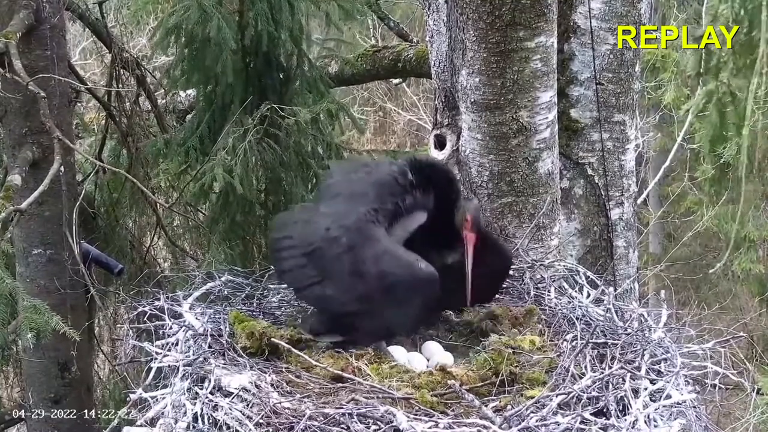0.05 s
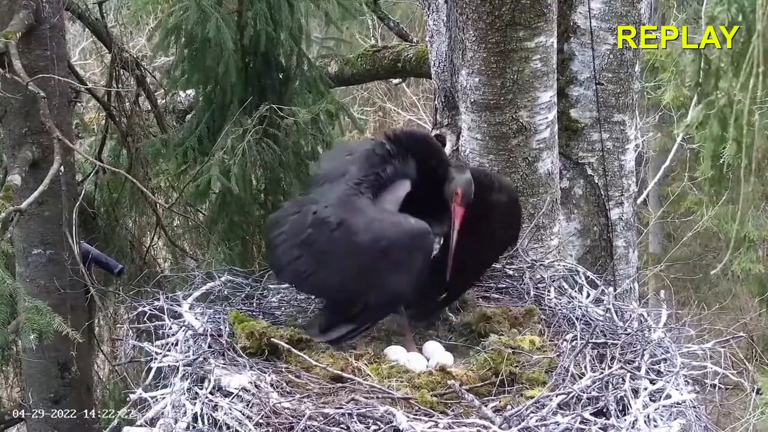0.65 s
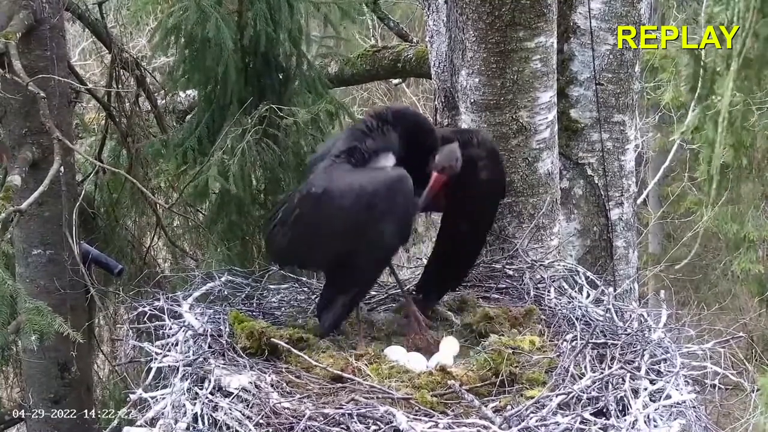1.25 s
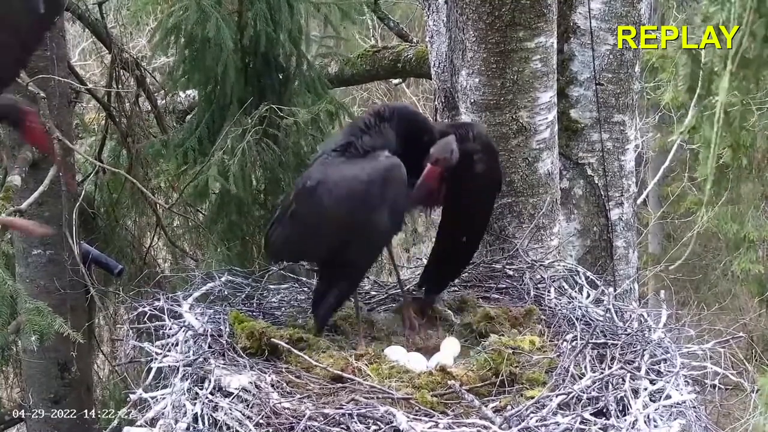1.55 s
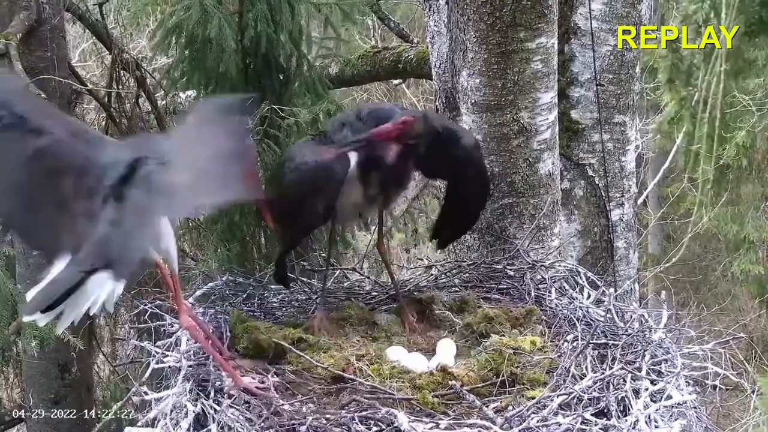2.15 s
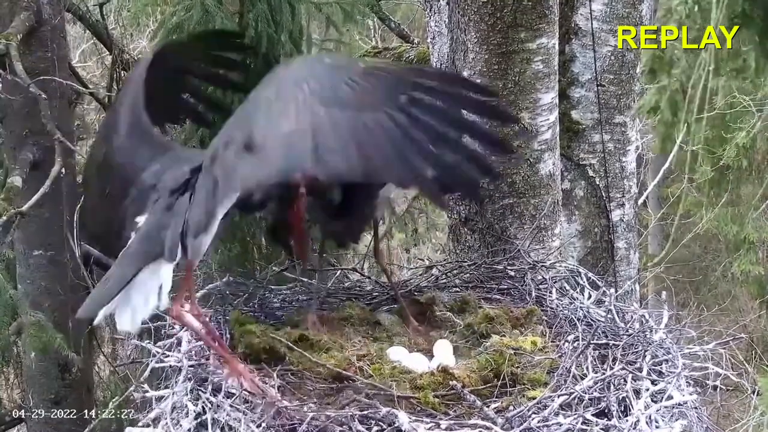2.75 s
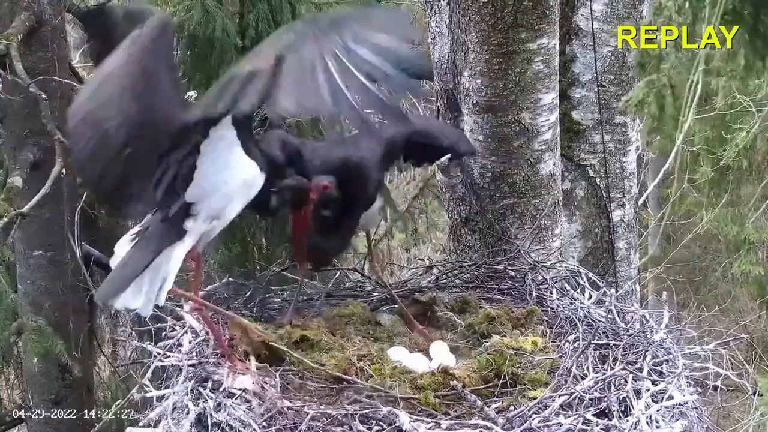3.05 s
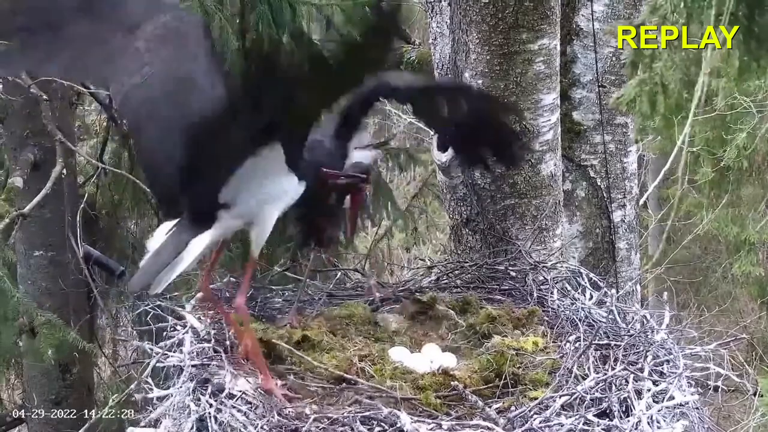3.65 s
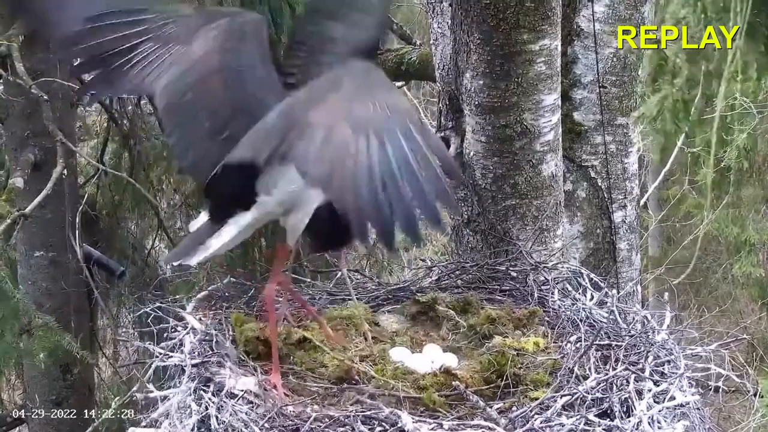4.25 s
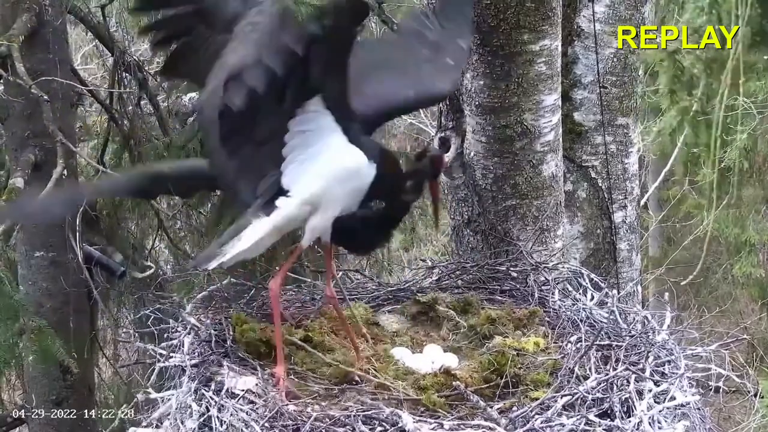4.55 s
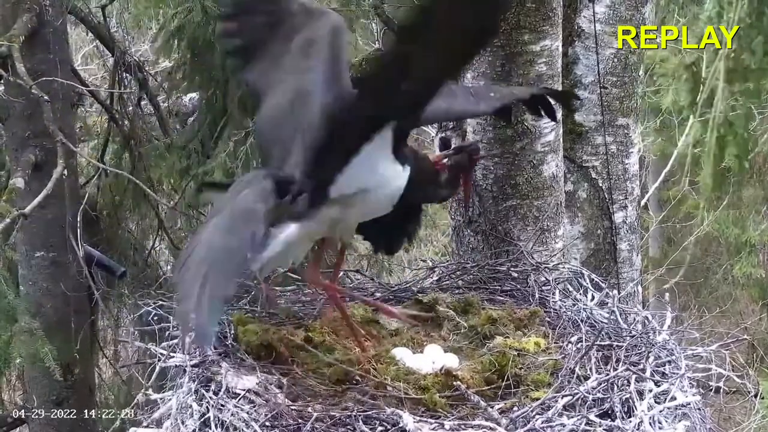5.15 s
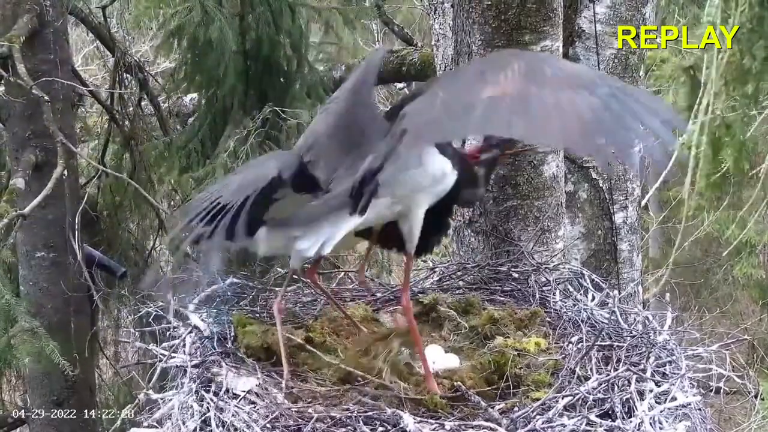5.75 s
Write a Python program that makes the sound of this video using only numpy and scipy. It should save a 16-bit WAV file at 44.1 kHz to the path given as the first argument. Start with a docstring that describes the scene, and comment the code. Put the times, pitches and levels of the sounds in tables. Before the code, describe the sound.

A large bird lands on a stick nest with sweeping wings and snapping twigs, amid hoarse hisses and three thin whistles.

```python
"""A black stork lands beside its mate on a stick nest high in a forest tree, over a low outdoor rumble.
First, feathers rustle on the sticks, twigs snap and a foot knocks the nest.
From 1.6 to 3.6 s, hoarse hisses of breath alternate with three thin, arched whistles.
Wings sweep the sticks during the calls and hardest near 4.2 s.
From 5.4 s, sweeps and snaps crowd together; heavy blows thud on the nest and ring the bough."""
import sys
import numpy as np
from scipy import signal
from scipy.fft import rfft, irfft, next_fast_len
from scipy.io import wavfile
from scipy.ndimage import uniform_filter1d, map_coordinates

SR = 44100
rng = np.random.default_rng(int(sys.argv[2]) if len(sys.argv) > 2 else 0)


def to_wav(sig):
    """Store sig (one row per channel, or 1-D mono) as 16-bit WAV at the path in sys.argv[1].

    Samples outside -1..1 are clipped; the rate is SR.
    """
    pcm = np.clip(np.atleast_2d(sig), -1, 1) * 32767
    pcm = np.round(pcm).astype(np.int16)
    wavfile.write(sys.argv[1], SR, pcm.T)  # frames by channels


N = 264147
TIME = np.arange(N) / SR

# Background. Each row: time in seconds, relative gust and rumble levels in dB.
WIND_LEVELS = [(0.0, -48.5, -41), (1.5, -42.5, -39.5), (2.7, -55, -43), (3.8, -49.5, -43),
               (5.1, -64, -42.5), (5.99, -54, -41.5)]
# Swells of deep air. Each row: centre in seconds, half length in seconds, level in dB.
GUST_SWELLS = [(0.98, 0.05, -31), (1.986, 0.057, -37.5), (5.697, 0.029, -45)]
# Gust and rumble spectra. Each row: frequency in Hz, gain in dB.
GUST_SPECTRUM = [(12, 2.5), (25, 10.5), (45, 28.5), (65, 10), (110, -24), (400, -53.5), (2000, -83.5)]
RUMBLE_SPECTRUM = [(40, -17), (70, -2), (110, 1), (160, -2.5), (250, -10), (400, -20.5), (700, -29),
                   (1200, -40.5), (2400, -45.5), (3300, -53), (4200, -59.5), (13000, -61)]
# Trunk, boughs and nearby trees. Each row: delay in seconds, gain in dB.
TREE_ECHOES = [(.0043, -34), (0.009, -21), (0.022, -26.5), (0.087, -30.5), (0.121, -42)]
# Feathers and feet stirring. Each row: time in seconds, relative level in dB.
RUSTLE_LEVELS = [(0.0, -85), (0.58, -71), (0.82, -64), (1.42, -61.5), (2.03, -51.5), (2.25, -55.5),
                 (2.47, -59), (2.62, -60.5), (3.1, -68.5), (3.49, -59), (3.7, -73.5), (4.1, -60),
                 (4.59, -60.5), (4.9, -59.5), (5.75, -52.5), (5.99, -49)]
# Feathers and quills on sticks. Each row: frequency in Hz, gain in dB.
FEATHER_SPECTRUM = [(500, -26), (900, -2.5), (1200, -0.5), (1800, 6), (2400, 6), (2900, -2), (3800, 1),
                    (5000, -7), (6600, -9), (9000, -8.5), (12000, -14.5), (13500, -18)]
QUILL_SPECTRUM = [(120, -40), (200, -42), (284, 10.5), (328, -37), (442, -2), (483, -8.5), (763, -3),
                  (1230, -9), (1460, 0), (2400, 6), (2860, -8.5), (3720, -5), (5200, -19), (9140, -23),
                  (13500, -33)]
# Feet on the moss lining. Each row: centre in seconds, half length in seconds, level in dB.
FOOT_SCUFFS = [(0.78, 0.024, -53.5), (2.027, 0.16, -54), (2.457, 0.08, -58), (4.4, 0.023, -55),
               (4.484, 0.03, -56)]
# Blows of feet and wings. Each row: start in seconds, relative level in dB, thud gain in dB,
# seconds for the rattle to fall 30 dB, relative bough ring in dB.
NEST_BLOWS = [(0.694, -45.5, 1.5, 0.19, -14), (1.966, -42.5, 13, 0.038, -26), (5.698, -29, -3, 0.032, -3),
              (5.9593, -29.5, 9.5, 0.058, -32), (5.9651, -23.5, -5, 0.037, -25)]
# Stick heap. Each row: frequency in Hz, width in Hz, gain in dB.
HEAP_MODES = [(132, 91, 7), (226, 36, -1), (420, 42, -21.5), (795, 23, -15), (1000, 430, -2),
              (1570, 180, 0), (2210, 290, -19), (3020, 300, -61.5)]
# Bough. Each row: frequency in Hz, T60 in seconds, gain in dB.
BOUGH_RING = [(413, 0.13, -3.5), (493, 0.067, 0), (618, 0.2, -1.5), (744, 0.12, -11), (1410, 0.026, 10.5),
              (2400, 0.035, 3)]
# Loud snaps. Each row: start in seconds, peak in dB, ring in Hz, wood and splinter in dB re the crack.
TWIG_SNAPS = [(0.071, -43.5, 3500, -10, 13), (0.329, -43, 2220, -17, -17), (0.489, -49, 2280, -8, -20),
              (0.632, -40, 2000, 3, -16), (0.6865, -37, 1990, -15, -14), (0.6934, -30.5, 2360, 8, -7),
              (0.916, -31.5, 2130, 4.5, -15), (1.534, -42.5, 3000, 7, 6), (2.128, -15.5, 2260, -10, -20.5),
              (2.1887, -34, 3120, -15, -18), (3.319, -31.5, 3260, -14, -13), (3.6624, -41.5, 2290, -7, -18),
              (3.972, -37, 2260, -20, -23), (4.021, -34.5, 1990, 9, -20), (4.3234, -26, 2440, -10, -6),
              (4.8962, -32.5, 2560, -5, -3.5), (5.254, -36, 2320, -18, 5), (5.371, -38, 2300, -4, 1),
              (5.4205, -35.5, 3800, -20, 6), (5.4698, -31, 2300, 0, -3), (5.4955, -23, 2300, -5, -7),
              (5.668, -15.5, 3360, -5.5, -20), (5.83, -33, 2500, -4, -10)]
# Twig resonances. Each row: multiple of the ring pitch, width in Hz, gain in dB.
CRACK_MODES = [(.68, 400, -3.5), (1, 331, 6.5), (1.55, 450, -15)]
# Wing strokes. Each row: peak time, rise and fall in seconds, level in dB, treble gain in dB.
WING_STROKES = [(1.772, 0.019, 0.023, -45.5, 14.5), (1.975, 0.057, 0.018, -46, -11),
                (2.04, 0.081, 0.028, -52.5, 26), (2.48, 0.21, 0.086, -48, 15.5),
                (3.766, .13, 0.081, -49.5, 13), (4.122, 0.017, 0.09, -32, 3.5),
                (4.174, 0.037, 0.041, -25.5, 2.5), (4.411, 0.087, 0.092, -50, 16),
                (4.55, 0.11, 0.14, -57.5, 18), (5.499, 0.029, 0.058, -39, 15),
                (5.509, 0.0064, 0.0055, -28, 5), (5.582, 0.022, .025, -43, 14.5),
                (5.686, 0.045, 0.057, -40, 10), (5.902, 0.015, 0.03, -34.5, 5.5),
                (5.927, 0.016, 0.024, -32, 7.5), (5.98, 0.01, .05, -34.5, 21.5)]
# Hisses. Each row: start, crest and end in seconds, relative level in dB, wheeze at the crest in Hz.
HISS_CALLS = [(1.582, 1.739, 1.796, -45.5, 3700), (2.136, 2.314, 2.395, -44.5, 3430),
              (2.705, 2.875, 2.96, -37, 3667), (3.29, 3.328, 3.43, -40.5, 3065),
              (3.349, 3.473, 3.535, -47, 3560), (3.543, 3.564, 3.62, -56.5, 3100)]
# Breath of a hiss; air beside a whistle; bill filter on overtones. Each row: frequency in Hz, gain in dB.
THROAT_SPECTRUM = [(900, -53.5), (1500, -30.5), (2050, -12.5), (2500, -3), (2900, -1.5), (3450, 0),
                   (3900, -2), (4400, -9.5), (5400, -20.5), (6500, -46), (8200, -29), (10500, -37),
                   (14000, -64)]
AIR_SPECTRUM = [(900, -41.5), (1500, -33), (2100, -5), (2650, 1), (3600, 1.5), (4300, -6.5), (5200, -18),
                (6700, -28.5), (8800, -24.5), (11000, -34), (14000, -43)]
BILL_RESPONSE = [(2600, -8), (4200, 2.5), (5000, 6.5), (5650, -1.5), (6200, -12), (7200, -16), (8400, -8),
                 (9400, -14), (11500, -18)]
# Whistles. Each row: start, crest and end in seconds, lower-register crest pitch and sag in Hz,
# level in dB, attack and release in seconds, relative overtone and rasp levels in dB, flutter in dB.
WHISTLE_CALLS = [(1.839, 2.001, 2.133, 2923, 544, -30.5, 0.03, 0.039, -23.5, -20.5, 2.5),
                 (2.393, 2.546, 2.7, 2877, 443, -34.5, 0.13, 0.055, -13.5, -24, 1.6),
                 (2.966, 3.109, 3.275, 3025, 1333, -20.5, 0.032, .14, -22.5, -27, 0.3)]
# Upper register of a forced whistle. Each row: start and end in seconds, pitch in Hz, glide in Hz/s.
REGISTER_LEAPS = [(1.991, 2.053, 3305, -1200), (3.033, 3.153, 3078, 654.5)]


def from_db(db):
    """Decibels to gain."""
    return 10 ** (np.asarray(db) / 20)


def rms_one(x):
    """Scales to unit power."""
    return x / np.sqrt(np.mean(x ** 2) + 1e-20)


def in_time(rows):
    """Each column of a curve, per sample."""
    s, *columns = np.transpose(rows)
    return [np.interp(TIME, np.sort(s), c) for c in columns]


def swells(rows):
    """Sum of bell-shaped envelopes."""
    return sum(from_db(db) * np.exp(-((TIME - s) / half_s) ** 2) for s, half_s, db in rows)


def drift(rate_hz):
    """Smooth random wander; rms one."""
    coarse = TIME[::16]
    wander = map_coordinates(rng.standard_normal(N // 32), [coarse * rate_hz * 2], order=2, mode="wrap")
    return np.interp(TIME, coarse, rms_one(wander))


def band(x, low_hz, high_hz):
    """Causal band-pass."""
    return signal.sosfilt(signal.butter(2, [low_hz, high_hz], "band", fs=SR, output="sos"), x)


def colour(x, spectrum):
    """Gives a steady noise a spectrum; rms one."""
    hz, db = np.transpose(spectrum)
    size = next_fast_len(N)
    bins_hz = np.maximum(np.arange(size // 2 + 1) * SR / size, 1)
    gain = from_db(np.interp(np.log(bins_hz), np.log(hz), db))
    return rms_one(irfft(rfft(x, size) * gain, size)[:N])


def noise(spectrum):
    """Coloured Gaussian noise; rms one."""
    return colour(rng.standard_normal(N), spectrum)


def narrow_noise(phase, rate_hz, on):
    """Noise band around a carrier phase."""
    return drift(rate_hz)[on] * np.sin(phase) + drift(rate_hz)[on] * np.cos(phase)


def resonance(x, hz, width_hz):
    """One damped mode; peak gain one."""
    r = np.exp(-np.pi * width_hz / SR)
    gain = (1 - r * r) / 2
    return signal.lfilter([gain, 0, -gain], [1, -2 * r * np.cos(2 * np.pi * hz / SR), r * r], x)


def grains(per_s, spread_db):
    """Random tiny contacts of uneven size."""
    sizes = from_db(spread_db * np.minimum(rng.exponential(1, N), 4))
    return rms_one(sizes * rng.choice([-1, 1], N) * (rng.random(N) < per_s / SR))


def add(out, start_s, sound):
    """Mixes a sound in."""
    start = int(start_s * SR)
    out[start:start + len(sound)] += sound[:max(N - start, 0)]


def wind(gustiness_db=0.5, rumble_gain_db=0.5):
    """Steady outdoor rumble with slow gusts beneath it."""
    gust_db, rumble_db = in_time(WIND_LEVELS)
    gusts = (from_db(gust_db + gustiness_db * drift(4)) + swells(GUST_SWELLS)) * noise(GUST_SPECTRUM)
    return gusts + from_db(rumble_db + rumble_gain_db) * noise(RUMBLE_SPECTRUM)


def forest(x, tail_db=-25, t60_s=0.22):
    """Adds echoes from the nearest wood and faint scatter from the trees around."""
    response = band(rng.standard_normal(SR), 270, 5000) * from_db(-60 * TIME[:SR] / t60_s)
    response = from_db(tail_db) * response / np.linalg.norm(response)
    for delay_s, db in TREE_ECHOES:
        response[int(delay_s * SR)] += from_db(db)
    return x + signal.fftconvolve(x, response)[:N]


def rustle(feather_db=1.5, moss_db=-5.5, waver_db=2.5):
    """Feathers slide over sticks in fine grains; the moss lining crunches dully."""
    db, = in_time(RUSTLE_LEVELS)
    feathers = from_db(feather_db) * colour(grains(per_s=9000, spread_db=2.9), FEATHER_SPECTRUM)
    moss = from_db(moss_db) * rms_one(band(grains(per_s=2500, spread_db=4.0), 320, 700))
    return from_db(db + waver_db * drift(25)) * (feathers + moss)


def scuffs(grit_db=6.5):
    """A foot drags through the lining with a short, hollow crunch."""
    crunch = grains(per_s=3000, spread_db=5.6)
    hollow = rms_one(resonance(crunch, 500, 270) - resonance(crunch, 793, 113))
    return swells(FOOT_SCUFFS) * hollow * from_db(grit_db * drift(80))


def knocks(heap_db=-20.0, bough_db=7.0, rattle_gain=0.18, thud_below_hz=500):
    """A blow rattles the springy stick heap; the bough rings on."""
    out, age = np.zeros(N), TIME[:SR // 5]
    bough = sum(from_db(db - 60 * age / t60_s) * np.sin(2 * np.pi * hz * age)
                for hz, t60_s, db in BOUGH_RING) / 2
    for start_s, db, thud_db, rattle_s, ring_db in NEST_BLOWS:
        blow = rattle_gain * rng.standard_normal(len(age)) * from_db(-30 * age / rattle_s)
        blow[0] = 2  # impact
        heap = sum(from_db(mode_db + thud_db * (hz < thud_below_hz)) * rms_one(resonance(blow, hz, width))
                   for hz, width, mode_db in HEAP_MODES)
        add(out, start_s, from_db(db) * (from_db(heap_db) * heap + from_db(bough_db + ring_db) * bough))
    return out


def small_twigs(per_s=4.5, gain_db=14, spread_db=3, ring_hz=2310, wood_db=-11, splinter_db=-9.5):
    """Snap rows for small twigs giving way at random, as strongly as the birds stir."""
    wait, strength = rng.random((64, 2)).T
    starts_s = np.cumsum(-np.log(1 - wait)) / per_s
    peaks_db = np.interp(starts_s, *np.transpose(RUSTLE_LEVELS)) + gain_db + spread_db * (2 * strength - 1)
    return [(s, db, ring_hz, wood_db, splinter_db) for s, db in zip(starts_s, peaks_db)]


def twigs(tear_t60_s=0.022, tear_gain=0.25, spray_decay_s=0.0026):
    """One sharp crack through the wood, then a short spray of tearing fibres."""
    out, age = np.zeros(N), TIME[:SR // 10]
    for start_s, peak_db, ring_hz, wood_db, splinter_db in TWIG_SNAPS + small_twigs():
        snap = tear_gain * rng.standard_normal(len(age)) * from_db(-60 * age / tear_t60_s)
        snap[0] = 2  # fracture
        spray = rng.standard_normal(len(age)) * np.exp(-age / spray_decay_s)
        ring = sum(from_db(db) * resonance(snap, ratio * ring_hz, width)
                   for ratio, width, db in CRACK_MODES)
        wood = from_db(wood_db) * rms_one(band(snap, 320, 730))
        crack = rms_one(band(ring, ring_hz / 2, ring_hz * 2))
        splinters = from_db(splinter_db) * rms_one(band(spray, 5700, 11100))
        sound = wood + crack + splinters
        add(out, start_s, from_db(peak_db) * sound / np.abs(sound).max())
    return out


def wing_sweeps(flutter_db=3.0, treble_hz=4800, air_db=-15.5, air_follow=0.7):
    """Stiff quills rake the sticks in a burst of contacts; the wing pushes a puff of air."""
    rake = colour(grains(per_s=11000, spread_db=2.8), QUILL_SPECTRUM) * from_db(flutter_db * drift(170))
    treble = signal.sosfiltfilt(signal.butter(2, treble_hz, "high", fs=SR, output="sos"), rake)
    air = rms_one(band(rng.standard_normal(N), 120, 520))
    out = np.zeros(N)
    for peak_s, rise_s, fall_s, db, treble_db in WING_STROKES:
        away = np.maximum((peak_s - TIME) / rise_s, (TIME - peak_s) / fall_s)
        near = away < 4
        stroke = from_db(-18.7 * away[near] ** 1.44)
        quills = from_db(db) * (rake[near] + (from_db(treble_db) - 1) * treble[near])
        out[near] += stroke * (quills + from_db(air_db + air_follow * db) * air[near])
    return out


def hiss(row, gain_db=-1.5, swell_db=10.5, rough_db=0.5, wheeze_db=-4.5, edge_s=0.012, throat_hz=3480):
    """Unvoiced rush with a narrow wheeze; both swell and slide up as the throat opens."""
    start_s, crest_s, end_s, crest_db, crest_hz = row
    away = np.maximum((crest_s - TIME) / (crest_s - start_s), (TIME - crest_s) / (end_s - crest_s))
    closing = np.clip(away, 0, 1) ** 1.5
    db = crest_db + gain_db - swell_db * closing
    hz = crest_hz * (1 - 0.16 * closing)
    gate = np.clip(np.minimum(TIME - start_s, end_s - TIME) / edge_s, 0, 1)
    on = gate > 0
    read_at = np.cumsum((hz[on] / throat_hz) ** 0.9)  # the spectrum slides with the wheeze
    rush = np.zeros(N)
    rush[on] = map_coordinates(noise(THROAT_SPECTRUM)[:SR], [read_at], order=3, mode="wrap")
    phase = 2 * np.pi * np.cumsum(hz[on]) / SR
    rush[on] += from_db(wheeze_db) * narrow_noise(phase, 200, on)
    return from_db(db + rough_db * drift(100)) * rush * gate


def whistle_arch(t, start_s, crest_s, end_s, crest_hz, sag_hz, db, attack_s, release_s):
    """Pitch and level: scoops up from slack, climbs, may leap, sags, drops as the air runs out."""
    slack_hz, scoop_s, climb_hz_per_s, spent_hz, drop_s = 1789, 0.01, 3300, 1400, 0.013
    attack_db, release_db = 19.5, 34
    leap_db, leap_sag_db_per_s, leap_s = 3, 35, 0.0029
    age, left = np.maximum(t - start_s, 0), np.maximum(end_s - t, 0)
    hz = crest_hz - climb_hz_per_s * np.maximum(crest_s - t, 0)
    hz -= sag_hz * (np.maximum(t - crest_s, 0) / (end_s - crest_s)) ** 2
    hz += (slack_hz - hz) * np.exp(-age / scoop_s) + (spent_hz - hz) * np.exp(-left / drop_s)
    level_db = db - attack_db * np.maximum(1 - age / attack_s, 0) ** 2
    level_db -= release_db * np.maximum(1 - left / release_s, 0) ** 1.6
    for up_s, down_s, upper_hz, glide_hz_per_s in REGISTER_LEAPS:
        upper = np.clip(np.minimum(t - up_s, down_s - t) / leap_s + 0.5, 0, 1)
        hz += upper * (upper_hz + glide_hz_per_s * (t - up_s) - hz)
        level_db += upper * (leap_db - leap_sag_db_per_s * (t - up_s))
    return hz, level_db


def whistle(row, jitter=0.0098, waver=0.0062, fray=0.29, rasp_blur=1.7, overtone_growth=0.32, air_db=-48):
    """A nearly pure, trembling tone; breaks up where weak, frays where forced."""
    start_s, crest_s, end_s, *shape, overtone_db, rasp_db, flutter_db = row
    gate = uniform_filter1d(1. * ((TIME > start_s) & (TIME < end_s)), size=256)
    on = gate > 1e-6
    hz, level_db = whistle_arch(TIME[on], start_s, crest_s, end_s, *shape)
    force_db = level_db - level_db.max()
    tremble = 1 + jitter * drift(350)[on] + waver * flutter_db * drift(22)[on]
    phase = 2 * np.pi * np.cumsum(hz * tremble) / SR
    rasp = np.minimum(from_db(rasp_db - force_db), 1)
    tone = np.sqrt(1 - rasp ** 2) * np.sin(phase) + rasp * narrow_noise(phase, 300, on) / np.sqrt(2)
    blur_rad = (fray * from_db(0.25 * (level_db + 31)) + rasp_blur * rasp) * drift(610)[on]
    for k in (2, 3):
        bill_db = np.interp(k * hz, *np.transpose(BILL_RESPONSE))
        partial_db = overtone_db + overtone_growth * force_db + bill_db + 2.0 * drift(50)[on]
        tone += from_db(partial_db) * np.sin(k * phase + blur_rad)
    out = np.zeros(N)
    out[on] = np.sqrt(2) * from_db(level_db + flutter_db * drift(50)[on]) * tone
    # the rush of air grows more slowly than the tone
    out[on] += from_db(air_db + 0.6 * (level_db + 38.5)) * noise(AIR_SPECTRUM)[on]
    return out * gate


def scene():
    """Calls and blows echo among the trees; rustle and rumble lie beneath."""
    calls = sum(whistle(row) for row in WHISTLE_CALLS) + sum(hiss(row) for row in HISS_CALLS)
    return (forest(calls + wing_sweeps() + twigs() + knocks()) + scuffs() + rustle() + wind())[None]


def record(dry):
    """Steep low-pass at 13.7 kHz."""
    return signal.sosfilt(signal.ellip(10, 0.2, 80, 13700, fs=SR, output="sos"), dry)


dry = scene()
out = record(dry)
to_wav(out)
```